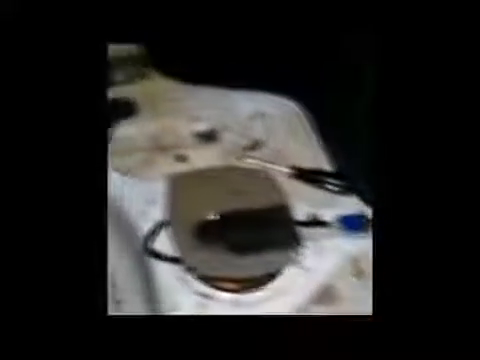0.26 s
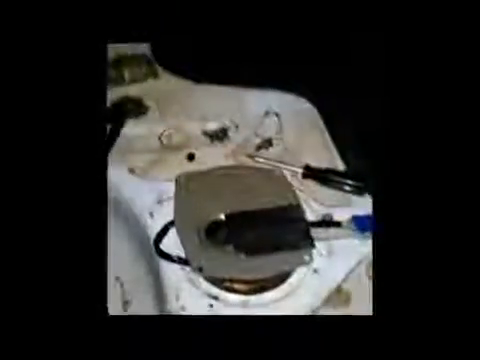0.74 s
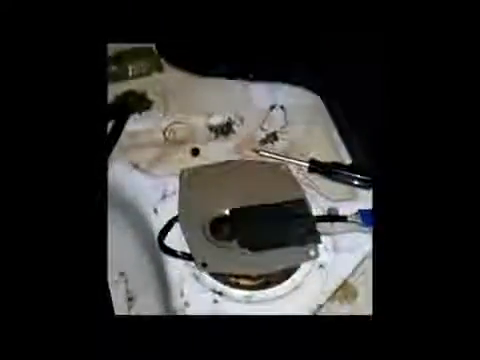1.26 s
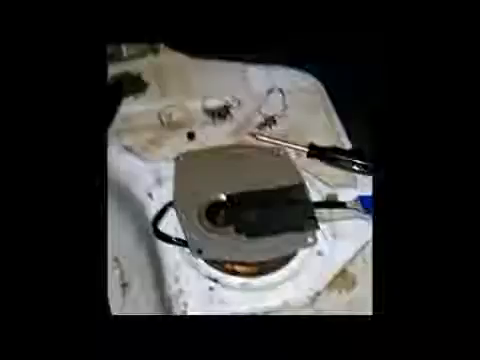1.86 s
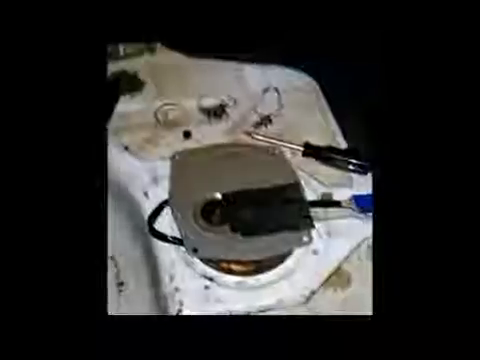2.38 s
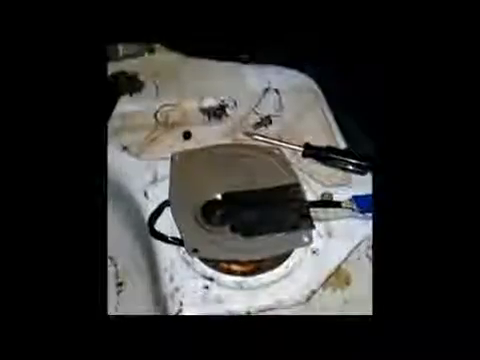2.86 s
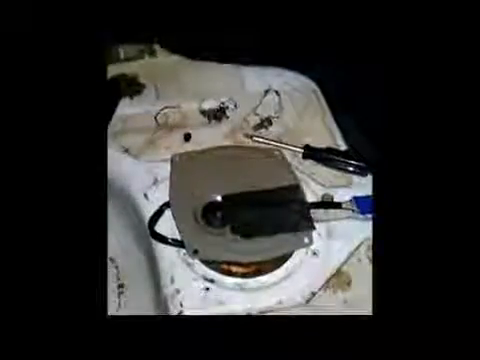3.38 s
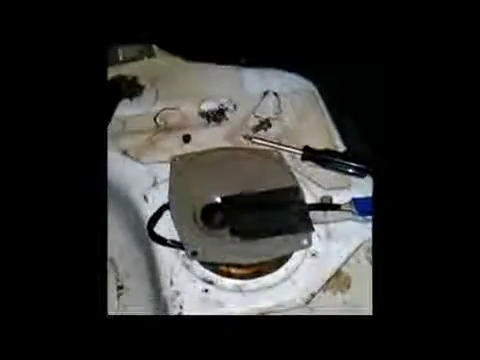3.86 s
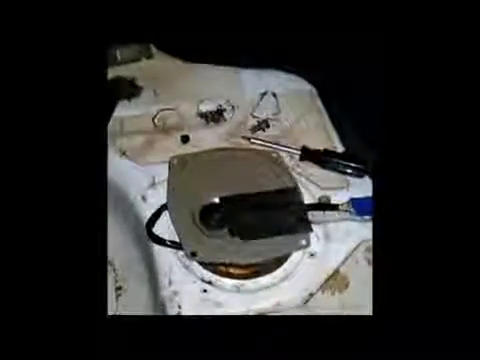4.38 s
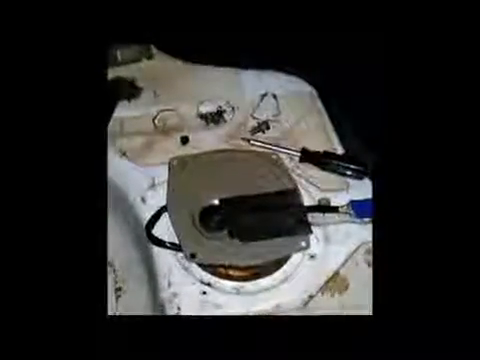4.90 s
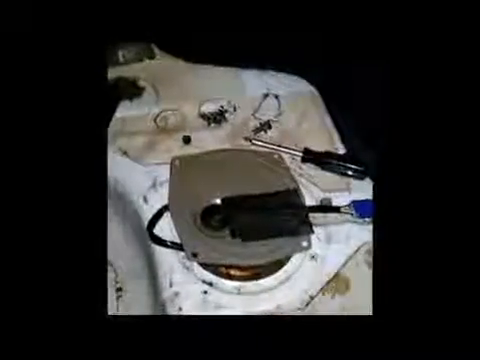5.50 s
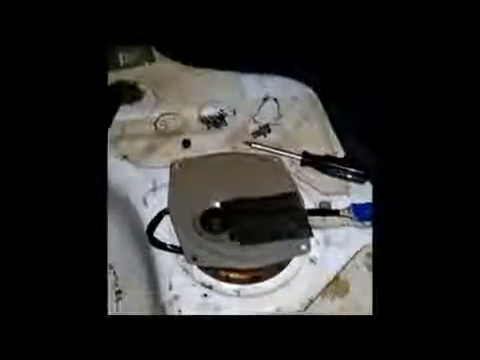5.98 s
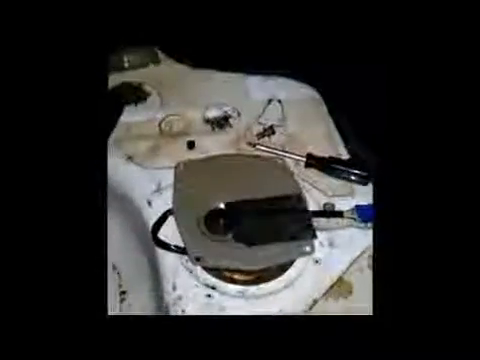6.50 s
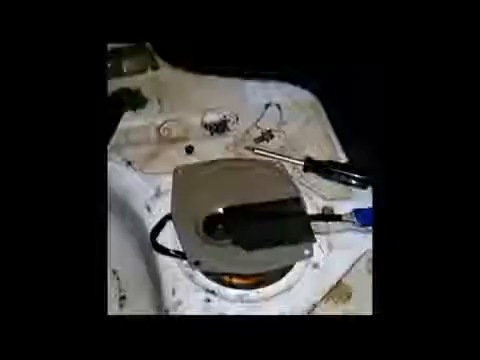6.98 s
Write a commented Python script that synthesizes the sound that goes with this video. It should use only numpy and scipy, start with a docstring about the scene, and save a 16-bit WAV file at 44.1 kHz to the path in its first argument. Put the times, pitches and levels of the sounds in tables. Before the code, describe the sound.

Hard clicks rattle over a suddenly loud idling engine, sizzling fuel hisses, crickets trill faintly, and an electric fuel pump hums softly before the hiss cuts off.

```python
"""An electric fuel pump's hum swells and slowly recedes under the open rear floor of a car: shaft harmonics.
After a quieter moment the idling engine (filtered thumps), fan air and fuel hiss (filtered noise) are suddenly
much louder; the hiss surges, settles and cuts off near the end. Hard parts click (noise bursts into resonances),
high pings recur (decaying sines), a low drone sinks through cabin resonances and crickets trill outside
(paired tones). One microphone, close to the tank lid."""
import sys
import numpy as np
from scipy import signal
from scipy.fft import rfft, irfft, next_fast_len
from scipy.io import wavfile
from scipy.ndimage import uniform_filter1d, map_coordinates

SR = 44100
rng = np.random.default_rng(int(sys.argv[2]) if len(sys.argv) > 2 else 0)


def wav_record(signal):
    """Record a signal, one row per channel, as 16-bit PCM in the file named by sys.argv[1]."""
    frames = np.transpose(np.atleast_2d(signal))
    bounded = np.clip(frames, -1, 1)
    # unit amplitude maps onto the largest positive 16-bit level
    quanta = np.round(bounded * 32767).astype(np.int16)
    wavfile.write(sys.argv[1], SR, quanta)


N = 319725
T = np.arange(N) / SR
LOUD_S = .604  # rumble, air and hiss are suddenly loud


def pump():
    """Slightly wandering shaft speed; the motor's harmonics come forward, hold and slowly recede."""
    # shaft harmonics: multiple, relative_db
    shaft_lines = [(1, 1.5), (2, 2), (4, -3)]
    shaft_hz, wander_share, level_db = 300.2, .002, -53.6
    hz = shaft_hz * (1 + wander_share * walk(2))
    envelope = swell(in_s=3.25, attack_s=.85, out_s=5.8, release_s=3.2)
    return undb(level_db) * envelope * tone(hz, shaft_lines, waver_db=0.8, jitter=0.00386)


def hiss(flicker_db=0.5, grain_db=2, drift=0.0046):
    """Fuel squeezed through a narrow gap sizzles, surges once with a breathy whistle, settles and stops."""
    # jet noise spectrum: centre_hz, relative_db_per_hz
    jet_spectrum = [(2500, -17), (4900, -13.5), (5700, -6.5), (6900, -6), (7900, 0.5), (8800, -3),
                    (10000, -8), (12000, -15), (15000, -20.5)]
    start_db, growth_db_per_s, surge_db = -47, 0.1247, 8
    surge = swell(in_s=1.8, attack_s=0.26, out_s=3.2, release_s=0.94)
    db = start_db + growth_db_per_s * T + surge_db * surge
    jet = unit(noise() * undb(grain_db * walk(900) + flicker_db * walk(25.1)))
    flow = undb(db) * colour(jet, jet_spectrum) * (1 - fade(6.96, 0.019))

    # the gap rings at the height of the surge
    whistle_hz, whistle_width_hz, whistle_db = 7840, 940, -38
    ring = band(whistle_hz, whistle_width_hz)
    read_at = np.cumsum(1 + drift * walk(11))
    ring = map_coordinates(ring, [read_at], mode="mirror")  # pitch drift by uneven reading
    envelope = swell(in_s=1.82, attack_s=0.52, out_s=2.41, release_s=0.064)
    return flow + undb(whistle_db) * envelope * ring


def contact(chatter, decay_s):
    """The force of one contact: a sharp crack, a dying chatter and a brief tail from the cabin."""
    rise_s, crack_db, tail_db, tail_s = .0005, 9.5, -21.5, .024
    age = T[:len(chatter)]
    decay = np.exp(-age / decay_s) + undb(tail_db) * np.exp(-age / tail_s)
    force = chatter * (1 - np.exp(-age / rise_s)) * decay
    force[int(2 * rise_s * SR)] += undb(crack_db)
    return force


def clicks(grain_db=-0.5, top_hz=11500, pivot_hz=8000):
    """Contact noise rings small hard parts at each click's pitch and gives a dull knock; high modes die first."""
    # clicks: start_s, relative_db, decay_s at pivot_hz, knock_relative_db, pitch_ratio, treble_relative_db
    click_events = [(.109, -43.5, .014, -1, 1.03, 0), (.176, -47.5, .022, 1, 1, 0),
                    (.195, -43, .007, 0, 0.85, 0), (.634, -38.5, 0.0052, 5, 1.06, 0),
                    (.738, -21, 0.0024, -7, 1.02, -2), (.746, -28, .006, -11, 0.97, -4),
                    (.763, -33, .003, -12, 0.93, 0), (.875, -27, 0.0036, -15, 1.12, -6),
                    (.878, -19, 0.0057, -14, 0.96, -9), (.933, -30, .0079, -15, 0.99, -6),
                    (.939, -22, .005, -18, 1.01, -7), (.945, -21, 0.0086, -1.5, 0.99, -10),
                    (0.95, -24, .005, -4, .96, -7), (0.984, -21, 0.0089, -8, 1, -3),
                    (.997, -40, .012, -15, 1, 0), (1.016, -29, 0.0069, -16, 1.03, -2),
                    (1.024, -13.5, 0.0079, -15.5, .99, -8), (1.062, -51, .0082, 19, 1, 0),
                    (1.164, -36.5, .01, -11, 1, 0), (1.274, -37, .011, -4, 1.02, 0),
                    (1.445, -44, .018, -8, 0.87, 0), (1.574, -36, .0077, -10, 0.98, 0),
                    (1.634, -21.5, .006, -10, 1.03, 3), (1.638, -21.5, .009, -10, 1, 4),
                    (1.793, -18, 0.0068, -9.5, 1, 0), (1.802, -28, 0.0086, 0, 0.97, 0)]
    # modes of the hard parts: centre_hz, width_hz, relative_db
    part_modes = [(2430, 170, -17.5), (3600, 1400, -19), (5050, 250, -16), (5600, 450, -12),
                  (6750, 600, -9.5), (7730, 260, 0.5), (8150, 420, 0), (9200, 1000, -10.5),
                  (13000, 2400, -18)]
    # dull knock spectrum: centre_hz, relative_db_per_hz
    knock_spectrum = [(200, 3.5), (550, 8.5), (1500, 7), (2500, 6.5), (3300, 12), (6000, 7), (9000, -0.5),
                      (14000, -21)]
    damping_power, treble_hz = 0.73, 10000  # decay falls with frequency; treble level applies above treble_hz
    ring_db, dull_db = 14.0, -1.0
    ring, dull, size = np.zeros(N), np.zeros(N), SR // 2
    chatter = unit(noise() * undb(grain_db * walk(1500)))
    for start_s, db, decay_s, knock_db, pitch_ratio, treble_db in click_events:
        start = int(start_s * SR)
        span = slice(start, start + size)
        dull[span] += undb(db + knock_db) * contact(chatter[span], decay_s)
        for k, (hz, width_hz, mode_db) in enumerate(part_modes):
            force = contact(chatter[span], decay_s * (pivot_hz / hz) ** damping_power)
            gain = undb(db + mode_db + treble_db * (hz > treble_hz))
            sign = (-1) ** k  # neighbouring modes in opposite phase
            ring[span] += sign * gain * resonate(force, hz * pitch_ratio, width_hz)
    # a contact of finite length softens the top
    ring = signal.sosfilt(signal.butter(2, top_hz, fs=SR, output="sos"), ring)
    return undb(ring_db) * ring + undb(dull_db) * colour(dull, knock_spectrum)


def rustle():
    """Soft band noise under the dense run of clicks."""
    envelope = swell(in_s=0.77, attack_s=0.082, out_s=1.46, release_s=0.082)
    return undb(-52.5) * envelope * band(hz=2780, width=2600)


def pings(rise_s=0.0041):
    """Decaying sines with a faint tail start quickly; two of them keep returning at an even pace."""
    # pings: first_s, voice, relative_db, count, repeat_relative_db
    ping_events = [(.03, "middle", -41, 1, 0), (.035, "high", -52, 1, 0), (.04, "faint", -50, 1, 0),
                   (.775, "faint", -50, 1, 0), (1.022, "middle", -30.5, 1, 0),
                   (1.304, "middle", -32.5, 1, 0), (1.342, "high", -46, 1, 0), (1.53, "faint", -48, 1, 0),
                   (1.62, "faint", -47, 1, 0), (1.686, "high", -36, 1, 0), (1.809, "low", -24.5, 1, 0),
                   (2.118, "high", -40, 4, -1.5), (2.648, "low", -26.5, 3, -7)]
    # partials of each voice: pitch_hz, relative_db, length_s
    ping_partials = {"faint": [(7190, 0, .07)], "low": [(8991, 0, .05)], "middle": [(9741, 0, .032),
                     (7190, -12, .045)], "high": [(11633, 0, .028), (2556, -11, .08)]}
    period_s, tail_db, tail_s = 1.557, -18, .05
    out, age = np.zeros(N), T[:SR // 2]
    tail = undb(tail_db) * np.exp(-age / tail_s)
    for first_s, voice, db, count, repeat_db in ping_events:
        ring = np.zeros(len(age))
        for hz, part_db, length_s in ping_partials[voice]:
            decay = np.exp(-(age / length_s) ** 2) + tail
            ring += undb(part_db) * decay * np.sin(2 * np.pi * hz * age)
        ping = np.sqrt(2) * undb(db) * (1 - np.exp(-age / rise_s)) * ring
        for k in range(count):
            at = int((first_s + k * period_s) * SR)
            out[at:at + len(age)] += undb(repeat_db if k else 0) * ping[:N - at]
    return out


def engine(scatter_db=1, jitter_s=0.00066):
    """One thump a crank turn booms in the floor pan; the louder the upper boom, the cleaner its throb."""
    # floor pan booms: centre_hz, relative_db
    deep_modes, upper_modes = [(12, -53), (25, -22), (38, -8.5), (50, -12), (62, 0.5), (75, -13),
                               (100, -14.5), (200, -61.5)], [(40, -37.5), (75, -11), (88, 4), (101, 1), (114, -0.5),
                                                  (127, -8.5), (150, -15.5), (180, -11.5), (300, -50),
                                                  (600, -80.5)]
    # level of the upper boom: time_s, level_db
    upper_curve = [(1.0, -38), (1.7, -43), (2.3, -35.5), (3.2, -37.5), (4.2, -45.5), (6.1, -39),
                   (6.8, -32.5), (7.25, -31.5)]
    turn_hz, first_turn_s, roughness = 12.58, 0.074, .6
    middle_deep_db, deep_yield = -39.5, 0.09  # dB lost by the deep boom per dB gained by the upper

    upper_db = curve(upper_curve)
    gain_db = upper_db - np.median(upper_db)
    deep_db = middle_deep_db - deep_yield * gain_db
    times = np.arange(first_turn_s, T[-1] - .01, 1 / turn_hz)
    chance = rng.standard_normal((len(times), 2))
    at = np.clip((times + jitter_s * chance[:, 0]) * SR, 0, N - 1).astype(int)
    thumps = np.zeros(N)
    thumps[at] = undb(scatter_db * chance[:, 1])
    thumps = unit(thumps)
    deep = colour(thumps + roughness * noise(), deep_modes)
    upper = colour(thumps + roughness * undb(-gain_db) * noise(), upper_modes)
    return undb(deep_db) * unit(deep) + undb(upper_db) * unit(upper)


def rush(flicker_db=.5):
    """Air from belts and fan: coloured noise, flickering, slowly growing and lifting towards the end."""
    # air spectrum: centre_hz, relative_db_per_hz
    air_spectrum = [(25, -4.5), (60, 8.5), (120, 10), (200, 3.5), (420, -0.5), (700, 1.5), (1050, 0),
                    (1370, 1.5), (1700, -1.9), (2100, -8), (2600, -11), (3300, -14.5), (5000, -18.5),
                    (6300, -21), (8000, -18), (11000, -22), (15000, -22.5)]
    start_db, growth_db_per_s, lift_db = -39.09, 0.4232, 0.8
    db = start_db + growth_db_per_s * T + lift_db * fade(5.9, 0.74)
    return undb(db) * colour(noise() * undb(flicker_db * walk(25)), air_spectrum)


def drone():
    """A low, unsteady hum sinks in pitch; each harmonic swells as it crosses a resonance of the cabin."""
    # pitch: time_s, pitch_hz
    pitch_curve = [(1.95, 141), (2.15, 133), (2.3, 129), (2.38, 123.5), (2.45, 120.5), (2.85, 111.5),
                   (3.05, 107), (3.2, 100), (3.6, 90)]
    # harmonics: multiple, relative_db
    hum_lines = [(1, 0), (2, 0), (3, 0), (8, 0)]
    # cabin resonances: centre_hz, width_hz, gain_db
    cabin_modes = [(97.7, 17, -36.5), (127, 17, -40.5), (190, 12, -56), (256, 10, -59), (331, 10, -51),
                   (978, 34, -49), (1060, 45, -49)]
    lines = tone(curve(pitch_curve), hum_lines, waver_db=2, jitter=.005)
    hum = swell(in_s=1.98, attack_s=0.31, out_s=3.52, release_s=0.19) * lines
    return sum(undb(db) * resonate(hum, hz, width_hz) for hz, width_hz, db in cabin_modes)


def whine():
    """One faint, slightly sinking tone in the quieter opening."""
    start_hz, sag_hz_per_s, level_db = 663, 29.8, -64
    hz = start_hz - sag_hz_per_s * T
    envelope = swell(in_s=0.19, attack_s=.1, out_s=LOUD_S, release_s=.01)
    return undb(level_db) * envelope * tone(hz, [(1, 0)], waver_db=1.5, jitter=.006)


def crickets(sag=0.004, uneven_db=1.8):
    """Each wing stroke is a scratchy, sagging tone pair; pace drifts and some strokes fail early in a trill."""
    # trills: start_s, end_s, pitch_hz, strokes_per_s, stroke_relative_db at start, pitch_scatter_share,
    # missed_share at start
    trill_events = [(1.78, 2.05, 3790, 40, -54, .008, 0), (2.28, 3.55, 4425, 40, -50.8, .004, 0),
                    (3.62, 4.02, 4410, 37, -51.7, .008, .2), (3.68, 3.88, 3570, 39, -50, .005, 0),
                    (3.64, 3.82, 3930, 42, -54, .011, 0), (4.01, 4.27, 3800, 40, -51.3, .007, 0),
                    (5.555, 7.25, 4440, 39.8, -48.2, .0015, .2)]
    stroke_peak_s, stroke_jitter_s, scratch_share, settle_s = .0053, .0008, .01, .1
    growth_db_per_s = 1.5
    lower_ratio, lower_db = .815, -9  # the wing's second tone
    out, age = np.zeros(N), T[:SR // 20]
    progress = age / stroke_peak_s
    shape = np.sqrt(2) * (progress * np.exp(1 - progress)) ** 2
    scratch = scratch_share * np.array([walk(1000), walk(1000)])
    for start_s, end_s, hz, rate_hz, db, scatter, missed in trill_events:
        beats = np.arange(start_s, end_s, 1 / rate_hz)
        beats = beats + np.cumsum(stroke_jitter_s * rng.standard_normal(len(beats)))
        for s in beats[beats < end_s - stroke_peak_s]:
            loud, sharp = rng.standard_normal(2)
            if rng.random() < missed * np.exp((start_s - s) / settle_s):
                continue
            at = int(s * SR)
            size = min(len(age), N - at)
            bend = sag * (1 - progress[:size])
            pitch = hz * (1 + scatter * sharp + bend + scratch[:, at:at + size])
            upper, lower = 2 * np.pi * np.cumsum(pitch, axis=1) / SR
            wing = np.sin(upper) + undb(lower_db) * np.sin(lower_ratio * lower)
            stroke_db = db + growth_db_per_s * (s - start_s) + uneven_db * loud
            out[at:at + size] += undb(stroke_db) * shape[:size] * wing
    return yard(out)


def yard(x):
    """Scattered reflections outside, a decaying noise echo, soften each stroke."""
    level_db, decay_s = -7, .016
    age = T[:SR // 8]
    echo = rng.standard_normal(len(age)) * np.exp(-age / decay_s)
    echo /= np.sqrt(np.sum(echo ** 2))
    return x + undb(level_db) * signal.fftconvolve(x, echo)[:N]


def quiet():
    """Coloured noise of the quieter opening, easing down by 2.2 dB."""
    # quiet spectrum: centre_hz, relative_db_per_hz
    quiet_spectrum = [(18, -3.5), (35, -11), (62, 2), (110, -4), (200, -10), (500, -16.5), (1400, -16.5),
                      (3400, -24), (6200, -26.5), (8040, -18.5), (10500, -29), (15000, -41)]
    db = -47.8 - 2.2 * fade(0.3, 0.13)
    return undb(db) * colour(noise(), quiet_spectrum)


def undb(db):
    """Decibels to gain."""
    return 10 ** (np.asarray(db) / 20)


def unit(x):
    """Scale to rms 1."""
    return x / np.sqrt(np.mean(x ** 2))


def curve(table):
    """Interpolate (time_s, value) rows sample by sample."""
    s, values = np.transpose(table)
    return np.interp(T, s, values)


def noise():
    """White noise."""
    return rng.standard_normal(N)


def walk(rate_hz):
    """Random levels held 1 / rate_hz seconds and slewed twice; rms 1."""
    k = max(int(SR / rate_hz), 2)
    steps = np.repeat(rng.standard_normal(N // k + 1), k)
    return unit(uniform_filter1d(uniform_filter1d(steps, k), k)[:N])


def fade(start_s, length_s):
    """A ramp from 0 to 1 that begins at start_s."""
    return np.clip((T - start_s) / length_s, 0, 1)


def swell(in_s, attack_s, out_s, release_s):
    """Attack, hold and release, from 0 to 1 and back."""
    return fade(in_s, attack_s) * (1 - fade(out_s, release_s))


def colour(x, spectrum):
    """Causal minimum-phase filter through (Hz, dB) points; white noise keeps its power."""
    size = 2 * next_fast_len(N)
    hz, db = np.transpose(spectrum)
    bins_hz = np.arange(size // 2 + 1) * SR / size
    gain = unit(undb(np.interp(np.log(bins_hz + 1), np.log(hz), db)))
    cepstrum = irfft(np.log(gain))
    cepstrum[1:size // 2] *= 2  # fold to the causal side
    cepstrum[size // 2 + 1:] = 0
    return irfft(rfft(x, size) * np.exp(rfft(cepstrum)))[:N]


def resonate(x, hz, width):
    """One resonance of a width in Hz, gain 1 at its centre."""
    return signal.lfilter(*signal.iirpeak(hz, hz / width, fs=SR), x)


def band(hz, width):
    """Noise through the same resonance twice; rms 1."""
    return unit(resonate(resonate(noise(), hz, width), hz, width))


def tone(hz, lines, waver_db, jitter):
    """Harmonics of a slightly unsteady pitch, each wavering in level."""
    phase = 2 * np.pi * np.cumsum(hz * (1 + jitter * walk(20))) / SR
    out = np.zeros(N)
    for multiple, db in lines:
        gain = undb(db + waver_db * walk(14.0))
        out += gain * np.sin(round(multiple) * phase + rng.uniform(0, 2 * np.pi))
    return np.sqrt(2) * out


def scene():
    """A quieter moment, then rumble, air and hiss are suddenly loud; pump, drone and crickets enter later."""
    loud = pump() + hiss() + engine() + rush() + drone() + crickets()
    on = fade(LOUD_S, 0.0011)
    mono = on * loud + (1 - on) * quiet() + whine() + clicks() + rustle() + pings()
    return np.array([mono, mono])


def record(dry):
    """The recorder cuts the top with a steep low-pass."""
    top_hz = 15100
    return signal.sosfilt(signal.ellip(10, .1, 80, top_hz, fs=SR, output="sos"), dry)


dry = scene()
out = record(dry)
wav_record(out)
```